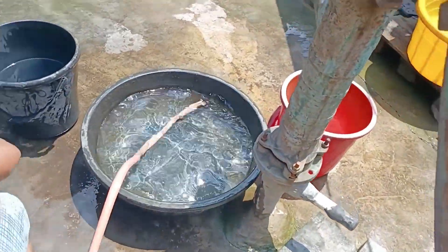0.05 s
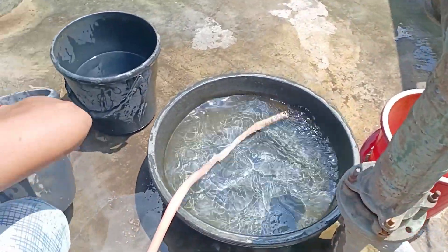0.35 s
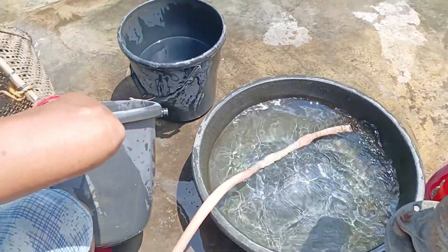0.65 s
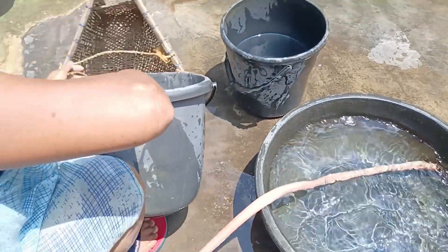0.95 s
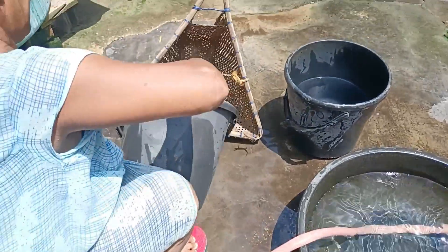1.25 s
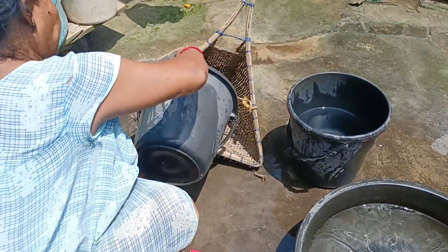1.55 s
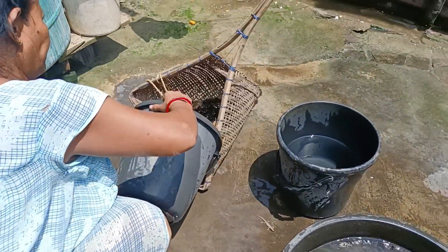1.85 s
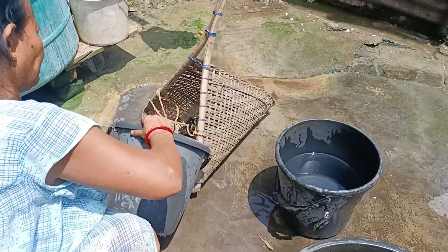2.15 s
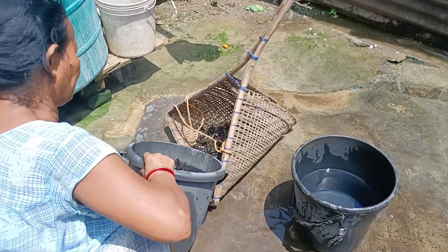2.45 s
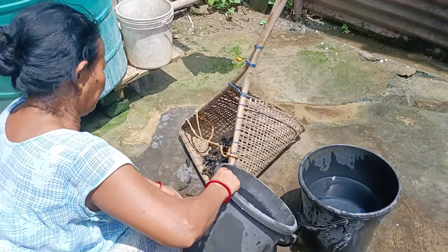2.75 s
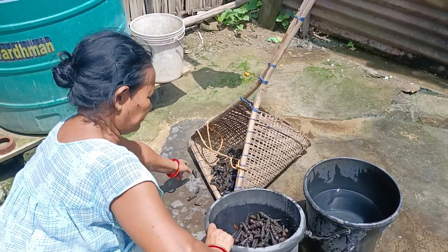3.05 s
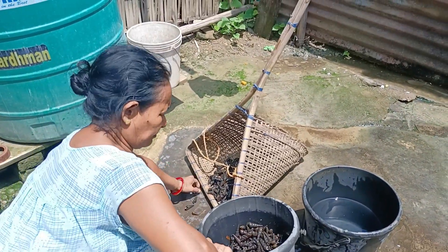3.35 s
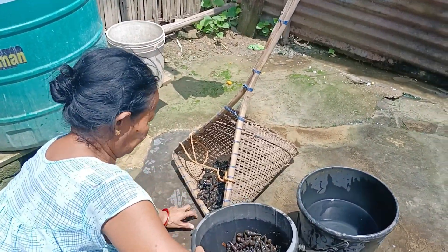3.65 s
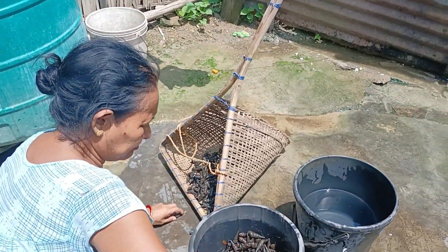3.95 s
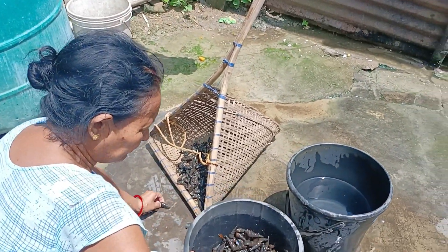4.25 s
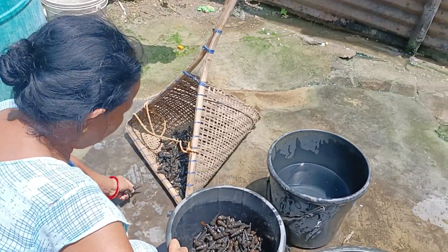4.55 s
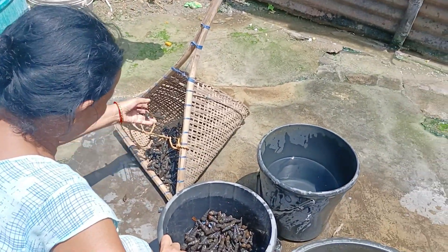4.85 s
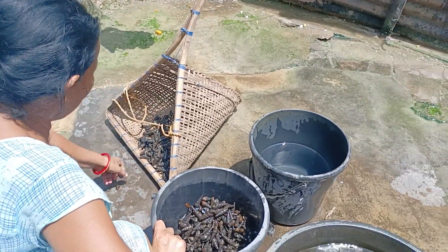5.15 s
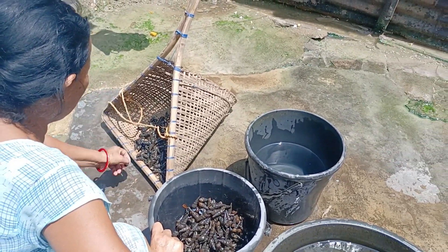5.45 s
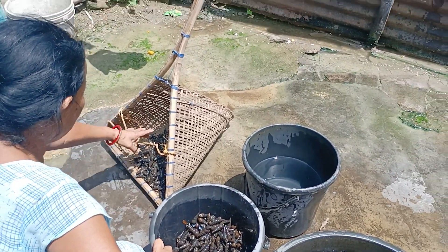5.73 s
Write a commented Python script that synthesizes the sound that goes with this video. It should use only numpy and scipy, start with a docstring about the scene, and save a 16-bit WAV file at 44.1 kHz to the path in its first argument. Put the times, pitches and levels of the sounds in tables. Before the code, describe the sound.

In an open yard, a plastic bucket bumps and small snail shells shift inside it. They slide out into a bamboo basket in a dense, bright rattle, pattering on the plastic, and the rest are shaken back with hollow knocks. Lighter stirring follows, something hard clatters on concrete, and single shells clink. The sounds are close, with a short echo over a faint low outdoor rumble.

```python
"""Small snail shells slide out of a tipped plastic bucket into a bamboo basket in an open yard.
Each collision is a tiny damped ring; thousands make the rattle and the patter on the bucket wall.
The bucket is righted, shaken and knocked: its wall rings and its hollow booms, lower while it leans.
Then something hard clatters on the concrete. Single shells clink here and there, weight lands in dull
thuds, and a short echo and a low outdoor rumble lie behind it all."""
import sys
import numpy as np
from scipy import signal
from scipy.io import wavfile

SR = 44100
rng = np.random.default_rng(int(sys.argv[2]) if len(sys.argv) > 2 else 0)


def to_wav(sig):
    """Store sig (one row per channel, or 1-D mono) as 16-bit WAV at the path in sys.argv[1].

    Samples outside -1..1 are clipped; the rate is SR.
    """
    pcm = np.clip(np.atleast_2d(sig), -1, 1) * 32767
    pcm = np.round(pcm).astype(np.int16)
    wavfile.write(sys.argv[1], SR, pcm.T)  # frames by channels


N = 264159

# freq_hz, gain_db
SHELL_EQ = [(900, -18), (2000, -6), (3500, -0.5), (5000, -1.5), (6200, 1.5), (7700, -5.5), (9000, -2),
            (10500, 0.5), (12500, 1), (15500, -3.5)]
PATTER_EQ = [(150, -39.5), (330, -5), (420, -9.5), (520, -7), (700, -1), (1150, 0), (1600, 1), (2300, 1),
             (3200, -2.5), (4500, -15.5), (8000, -43)]
BUCKET_EQ = [(70, -20), (110, -15.5), (150, 4.5), (200, -1), (15000, -2)]  # little radiation below the hollow


def shell_rattle():
    """Shells tick on each other, sometimes ring, patter on the plastic and stir the bucket's air."""
    t = np.arange(N) / SR
    shell_db, tilt_db_oct, wall_db, hollow_db = follow(shell_motion(), t)
    ticks = collisions(shell_db, tilt_db_oct, low_hz=2138, high_hz=14980, decay_cycles=4, spread_db=1.5,
                       min_density=0.55, full_db=-19, lag_s=0.0003, count=48000, size=104)
    tinkle_db = shell_db + 1.2 * np.minimum(tilt_db_oct, 2)
    tinkle = collisions(tinkle_db, tilt_db_oct, low_hz=9170, high_hz=13970, decay_cycles=66, spread_db=3,
                        min_density=0.6, full_db=-19.5, lag_s=0.00033, count=900, size=768)
    patter = collisions(wall_db, np.zeros(N), low_hz=361, high_hz=3510, decay_cycles=6.1, spread_db=2,
                        min_density=0.6, full_db=-28, lag_s=0.00015, count=15000, size=384)
    hollow_hz = hollow_pitch(t)
    air = resonate(stereo_noise(N), hollow_hz, width_hz=75)
    air = resonate(air, hollow_hz, width_hz=85)
    shells = colour(amp(-0.92) * ticks + amp(-15) * tinkle, SHELL_EQ)
    bucket = amp(1.03) * colour(patter, PATTER_EQ) + amp(hollow_db + 0.15) * unit_rms(air)
    return shells + colour(bucket, BUCKET_EQ, size=4096)


def collisions(level_db, tilt_db_oct, low_hz, high_hz, decay_cycles, spread_db,
               min_density, full_db, lag_s, count, size):
    """Tiny rings of random pitch crowd as the load moves faster; rms follows level_db."""
    when, pitch, chance, phase = rng.random((count, 4)).T
    heft, delay, pan = rng.standard_normal((count, 3)).T
    at = (when * (N - 1)).astype(int)
    density = np.clip(amp((level_db[at] - full_db) / 2), min_density, 1)
    octaves = np.log2(high_hz / low_hz)
    slope_db = tilt_db_oct[at] * octaves
    mean_power = np.mean(amp(slope_db[:, None] * np.linspace(0, 1, 10)) ** 2, 1)
    gain = unit_rms(amp(spread_db * np.clip(heft, -2, 2))) * amp(slope_db * pitch + level_db[at])
    gain /= np.sqrt(mean_power * density * count / N)
    hit = chance < density
    at, pitch, phase, gain, delay, pan = (v[hit, None] for v in (at, pitch, phase, gain, delay, pan))
    hz, n = low_hz * 2 ** (octaves * pitch), np.arange(size)
    cycles = hz * n / SR
    envelope = np.exp(-cycles / decay_cycles) * (1 - np.exp(-2 * cycles)) * (1 - n / size)
    envelope *= gain / np.sqrt((envelope ** 2).sum(1, keepdims=True) / 2)
    out = []
    for side in (-0.5, 0.5):
        tones = np.sin(2 * np.pi * (cycles + phase + side * lag_s * hz * delay))
        grains = envelope * np.sqrt(1 + side * np.tanh(pan)) * tones
        out.append(np.bincount((at + n).ravel(), grains.ravel(), N)[:N])
    return np.array(out)


# per pour: time_s, shell_db, tilt_db_oct, wall_db, hollow_db
POURS = [
    [(1.51, -38, -6.5, -37, -50), (1.53, -30.5, 1, -31, -43), (1.61, -23.5, -5, -19.5, -37),
     (1.64, -19, 1, -12, -24), (1.72, -15, -4, -12.5, -34), (1.835, -16, -3.5, -12.5, -32.5),
     (1.865, -6.5, 2, -18.5, -32), (2.125, -18, -1.5, -24.5, -40.5), (2.155, -16.5, -1.5, -22, -22.5),
     (2.275, -25.5, -2.5, -23.5, -27.5), (2.32, -30, -2, -29.5, -50), (2.45, -38, -3, -58, -53.5)],
    [(2.468, -37, -2, -36, -59), (2.478, -20.5, -12, -25.5, -49), (2.51, -23.5, -9.5, -22.5, -40.5),
     (2.535, -16.5, -6.5, -14, -25.5), (2.67, -18, -5.5, -19, -25), (2.74, -32.5, -2, -26.5, -31.5),
     (2.79, -26, -7, -24.5, -30), (2.865, -49.5, -4, -44, -50)],
]  # out into the basket, then the rest shaken back
# start_s, rise_s, hold_s, shell_db, tilt_db_oct, wall_db
STIRS = [(0.0, 0.0017, 0.042, -47.5, -4.5, -58), (0.078, .02, .07, -58, -5, -58.5),
         (0.155, 0.015, 0.008, -35, -13.5, -42.5), (0.229, 0.028, 0.096, -37, -8.5, -46.5),
         (0.382, .017, 0.087, -44, 1, -53), (0.467, 0.032, 0.066, -39, -2, -43.5),
         (0.633, 0.01, 0.039, -46.5, -1.5, -48), (0.688, 0.021, 0.046, -44.5, -3, -38),
         (0.75, 0.017, 0.012, -30.5, -5.5, -60), (0.854, 0.014, 0.039, -34, -3, -41.5),
         (0.977, .012, 0.12, -33.5, -3.5, -48), (1.23, 0.0074, 0.023, -30, -9.5, -28),
         (1.305, .03, 0.19, -38, -11.5, -39), (2.893, 0.0031, 0.021, -26.5, -13, -25),
         (2.955, 0.017, .025, -36.5, -10, -37.5), (3.036, 0.014, 0.068, -28, -8, -30),
         (3.089, 0.13, 0.12, -29.5, -4.5, -31), (3.336, 0.058, 0.15, -33, -3.5, -31.5),
         (3.57, 0.082, 0.066, -39, -4, -37), (3.734, 0.0033, 0.028, -45, 4, -30.5),
         (3.808, 0.027, 0.064, -54, -1, -43.5), (3.874, 0.0033, 0.036, -36.5, -4, -32),
         (3.95, .004, 0.017, -29.5, -27, -48), (4.124, 0.021, 0.074, -62.5, -1, -66),
         (4.242, 0.064, .02, -41.5, -3, -44), (4.37, 0.017, 0.077, -45.5, -3, -50.5),
         (4.536, 0.028, 0.095, -29.5, -19, -33), (4.662, 0.039, 0.11, -62, -7, -47),
         (5.159, 0.006, 0.013, -30.5, -3, -45), (5.184, .004, 0.038, -27, 0.5, -59),
         (5.307, .012, .015, -46.5, -3, -57), (5.417, 0.018, .025, -44, -3.5, -51),
         (5.8, 0.062, 0.12, -53.5, -4.5, -73.5), (5.88, 0.0066, 0.024, -42, -2, -55)]
REST_DB, SAG_DB_PER_S, SETTLE_DB_PER_S = -79, 8.5, 300.5
HOLLOW_HELD_DB, HOLLOW_STANDING_DB, SET_DOWN_S = -8, -19, 3.94  # levels relative to wall_db


def shell_motion():
    """Stirs and pours add in power, the loudest dominating the tilt; columns as in POURS."""
    t = np.arange(0, N, 32) / SR
    rest = np.outer([REST_DB, 0, REST_DB, REST_DB], np.ones_like(t))
    moves = [rest] + [stir(t, *row) for row in STIRS] + [pour(t, curve) for curve in POURS]
    shell_db, tilt_db_oct, wall_db, hollow_db = np.swapaxes(moves, 0, 1)
    tilt_db_oct = np.average(tilt_db_oct, axis=0, weights=amp(shell_db) ** 2)
    shell_db, wall_db, hollow_db = 10 * np.log10((amp([shell_db, wall_db, hollow_db]) ** 2).sum(1))
    return np.transpose([t, shell_db, tilt_db_oct, wall_db, hollow_db])


def pour(t, curve):
    """The sliding load follows its curve and dies away on either side."""
    shell_db, tilt_db_oct, wall_db, hollow_db = follow(curve, t)
    fade_db = -SETTLE_DB_PER_S * abs(t - np.clip(t, curve[0][0], curve[-1][0]))
    return shell_db + fade_db, tilt_db_oct, wall_db + fade_db, hollow_db + fade_db


def stir(t, start_s, rise_s, hold_s, shell_db, tilt_db_oct, wall_db):
    """Nudged shells speed up, slowly lose force, then settle."""
    held_s = t - start_s - rise_s
    shape_db = 20 * np.log10(np.clip((t - start_s) / rise_s, 1e-6, 1))
    shape_db -= SAG_DB_PER_S * np.clip(held_s, 0, hold_s)
    shape_db -= SETTLE_DB_PER_S * np.maximum(held_s - hold_s, 0)
    hollow_db = wall_db + (HOLLOW_HELD_DB if start_s < SET_DOWN_S else HOLLOW_STANDING_DB)
    return shell_db + shape_db, np.full_like(t, tilt_db_oct), wall_db + shape_db, hollow_db + shape_db


# start_s, wall_db, hollow_db, crack_db, spot_hz
KNOCKS = [(0.172, -39.5, -42, -40, 2300), (0.504, -27.5, -37.5, -37, 950), (0.705, -35.5, -37.5, -37, 1150),
          (0.879, -30.5, -37, -30.5, 2000), (0.9698, -18, -29.5, -20, 2100),
          (0.9725, -11, -27.5, -17.5, 1420), (1.128, -23.5, -34.5, -29.5, 1210),
          (1.237, -25.5, -33, -33, 2000), (1.337, -30, -50, -55, 1390), (1.523, -26, -38, -25.5, 2610),
          (1.622, -10, -20, -24, 1070), (1.645, -11, -25, -13, 1133), (1.699, -11.5, -36, -25.5, 1330),
          (1.729, -11.5, -33, -9.5, 1527), (1.802, -19, -22, -27, 2537), (1.975, -26, -24.5, -25.5, 2600),
          (2.098, -20.5, -46, -22, 1200), (2.138, -15, -25, -22.5, 1450), (2.36, -26.5, -64, -24.5, 1199),
          (2.476, -22, -46, -22.5, 2450), (2.506, -16, -47, -19, 1190), (2.64, -12, -32, -30, 730),
          (2.68, -17, -23, -20, 1148), (2.748, -21.5, -46, -43.5, 830), (2.916, -15.5, -20.5, -23, 800),
          (3.115, -20, -32, -40, 850), (3.351, -24, -36, -44, 880), (3.368, -17, -18.5, -46, 880),
          (3.476, -17.5, -36, -26.5, 950), (3.485, -20.5, -21, -24, 1000), (3.529, -21.5, -32, -51, 760),
          (3.69, -29.5, -41, -50, 830), (3.745, -14, -30, -23.5, 1010), (3.75, -23.5, -16.5, -38, 535),
          (3.958, -25.5, -56.5, -28.5, 1020)]
# freq_hz, gain_db, t60_s
WALL_MODES = [(400, -7.5, 0.044), (525, -3, 0.16), (616, -5, 0.11), (756, -4, 0.11), (850, 2, 0.07),
              (991, -1.5, 0.038), (1090, -1.5, 0.13), (1160, -4.5, 0.048), (1442, -5.5, 0.091),
              (1625, -0.5, 0.059), (1903, -13, 0.021), (1920, -3.5, 0.1), (2210, -6, .05), (2510, -20, .05),
              (2890, -13.5, 0.2)]
# freq_hz, gain_db
SLAP_EQ = [(120, -25.5), (300, 5), (800, 0), (1600, 0.5), (2400, -8.5), (4000, -23.5), (9000, -49.5)]
CRACK_EQ = [(500, -27), (1500, 1.5), (2400, 4.5), (4000, -3), (6200, -8.5), (7700, -21), (11000, -16),
            (15000, -26)]


def bucket_knocks():
    """Each blow rings the wall and the hollow, with a slap and a crack at the contact."""
    out, t = np.zeros((2, N)), np.arange(SR // 5) / SR
    for start_s, wall_db, hollow_db, crack_db, spot_hz in KNOCKS:
        modes = ring(t, WALL_MODES, spot_hz, focus_db=11, scatter_db=2, detune=0.03, lag_s=0.0002)
        modes *= 1 - np.exp(-t / 0.0011)
        wall = amp(-0.5) * modes + amp(-4.5) * burst(t, SLAP_EQ, t60_s=0.046)
        boom = amp(hollow_db + 0.06) * hollow(t, start_s, t60_s=0.1)
        crack = amp(crack_db) * burst(t, CRACK_EQ, t60_s=0.13)
        add(out, start_s, amp(wall_db) * wall + boom + crack)
    return colour(out, BUCKET_EQ, size=4096)


def hollow(t, start_s, t60_s):
    """The air in the bucket booms after a blow, and the bucket's base with it."""
    hz, sides = hollow_pitch(start_s), np.array([[1], [-1]])
    air = np.sin(2 * np.pi * hz * t + sides * hz / 850) * amp(-60 * t / t60_s)
    base = np.sin(2 * np.pi * 385 * t - sides * 0.45) * amp(1 - 60 * t / 0.061)
    return unit_attack((air + base) * (1 - np.exp(-t / 0.004)))


# tipped_s, until_s, righting_s
TIPS = [(.15, .22, 0.16), (0.873, 1.026, 0.12), (1.635, 2.032, 0.79)]
UPRIGHT_HZ, TIPPED_HZ, TIPPING_S = 305.2, 180, 0.23


def hollow_pitch(time_s):
    """The hollow falls in pitch as the bucket tips and returns as it is righted."""
    lean = sum(np.interp(time_s, [tipped - TIPPING_S, tipped, until, until + righting], [0, 1, 1, 0])
               for tipped, until, righting in TIPS)
    return UPRIGHT_HZ + (TIPPED_HZ - UPRIGHT_HZ) * lean


# start_s, body_db, hollow_db, crack_db, spot_hz
CLATTER = [(4.422, -30, -37.5, -50, 726), (4.506, -19.5, -28, -40, 586), (4.555, -19, -38, -34, 1710),
           (4.58, -13, -29.5, -28, 760), (4.594, -14.5, -37, -23, 770), (4.611, -27, -34, -43, 780),
           (4.619, -20, -45, -45, 800), (4.633, -27, -34.5, -36, 715), (4.648, -23.5, -43, -35, 575),
           (4.669, -24.5, -54, -46, 1730), (4.685, -26, -60, -56, 760), (4.739, -33, -51, -41, 750),
           (4.789, -35, -57, -76, 835), (4.816, -37.5, -61, -66, 555), (4.853, -53, -61, -60, 618),
           (5.164, -37, -70, -41, 780), (5.331, -48, -59, -60, 780), (5.445, -40, -46, -52, 1660),
           (5.454, -38, -54, -47, 1680), (5.644, -44, -62, -58, 1137), (5.892, -49.5, -66, -46, 605),
           (5.975, -49, -79, -49, 1430)]
# freq_hz, gain_db, t60_s
CLATTER_MODES = [(490, -7, 0.16), (559.5, -3, 0.16), (619, -2, 0.088), (767, 2.5, 0.099), (861, -1, 0.028),
                 (1170, -3.5, .025), (1620, 3.5, 0.055), (1775, 3, 0.025), (2300, -6, 0.03)]


def clatter():
    """Something hard rocks to rest on the concrete in dry, partly choked clacks."""
    out, t = np.zeros((2, N)), np.arange(SR // 5) / SR
    choke = 0.46 + np.exp(-t / 0.0064)
    for start_s, body_db, hollow_db, crack_db, spot_hz in CLATTER:
        modes = ring(t, CLATTER_MODES, spot_hz, focus_db=5, scatter_db=2, detune=0.05, lag_s=0.0001)
        body = amp(0.14) * unit_attack(modes * choke) + amp(-20) * burst(t, SLAP_EQ, t60_s=0.089)
        boom = amp(hollow_db) * hollow(t, start_s, t60_s=0.16)
        crack = amp(crack_db) * burst(t, CRACK_EQ, t60_s=0.059)
        add(out, start_s, amp(body_db) * body + boom + crack)
    return colour(out, [(90, -11), (180, -15.5), (280, -2), (15000, 0.5)])


# start_s, tick_db, ring_db, pitch_hz
CLINKS = [(0.039, -62, -50, 2740), (.318, -51, -40, 2180), (.383, -46.5, -46, 10700),
          (.395, -56, -38, 12160), (.915, -49, -36, 12300), (1.056, -44, -37.5, 9720),
          (2.8953, -30, -32, 2280), (3.037, -39.5, -47, 2570), (3.228, -40, -42, 6100),
          (3.355, -41, -35.5, 11320), (3.436, -39.5, -40.5, 13900), (3.486, -40, -31.5, 11800),
          (3.756, -33.5, -38, 12400), (3.825, -50, -40.5, 10320), (3.879, -37.5, -33, 13400),
          (3.92, -37, -33, 2930), (4.4, -35, -47, 10580), (5.167, -37, -26.5, 9450),
          (5.193, -17.5, -17, 4940), (5.2235, -31, -22, 11460), (5.233, -44, -30.5, 11500),
          (5.32, -37, -40, 6620), (5.421, -43.5, -51, 14130), (5.89, -40, -46.5, 6280)]


def shell_clinks():
    """A single shell rings with a cluster of close modes over a sharp tick."""
    out, t = np.zeros((2, N)), np.arange(SR // 8) / SR
    cluster = [(0.94, -3.5, 0.018), (0.975, 4.5, 0.026), (1.01, -8.5, 0.029), (1.05, -3.5, 0.028)]
    tick_eq = [(600, -47), (2000, -16), (4500, 8), (6500, 9.5), (8000, 1.5), (11500, 0), (15000, -5)]
    for start_s, tick_db, ring_db, pitch_hz in CLINKS:
        modes = [(pitch_hz * ratio, gain_db, t60_s) for ratio, gain_db, t60_s in cluster]
        tick = burst(t, tick_eq, t60_s=0.033)
        ping = ring(t, modes, pitch_hz, focus_db=1.5, scatter_db=5, detune=0.005, lag_s=0.00035)
        add(out, start_s, amp(ring_db) * ping + amp(tick_db) * tick)
    return out


# start_s, level_db, pitch_hz, t60_s
THUDS = [(0.88, -22.5, 171, 0.06), (0.9714, -10, 372, 0.058), (0.9729, -14, 611, 0.086),
         (0.975, -28, 165, 0.14), (1.128, -13.5, 427, 0.021), (1.622, -19, 59.4, 0.11),
         (3.114, -17.5, 806, 0.054), (4.457, -26, 78.5, 0.23), (4.504, -16, 500, 0.057),
         (4.58, -33, 41.6, 0.37)]


def thuds():
    """Bumps of the loaded bucket and of weight on the ground: one damped mode each."""
    out, t = np.zeros((2, N)), np.arange(SR // 4) / SR
    for start_s, level_db, pitch_hz, t60_s in THUDS:
        envelope = amp(level_db - 60 * t / t60_s) * (1 - np.exp(-2 * pitch_hz * t))
        add(out, start_s, envelope * np.sin(2 * np.pi * pitch_hz * t)[None])
    return out


# freq_hz, gain_db
ECHO_EQ = [(100, -19.5), (200, -6.5), (300, 1.5), (500, -2.5), (1500, -3.5), (5000, -0.5), (15000, 0)]
# freq_hz, t60_s
ECHO_T60 = [(150, 0.72), (400, 0.24), (1000, 0.3033), (3000, 0.0555), (7000, 0.2447), (15000, 0.16)]


def yard_echo(x):
    """Ground and fences scatter a short tail."""
    hz, t, spectrum = signal.stft(stereo_noise(SR // 2), SR, nperseg=256)
    decay_db = at_hz(ECHO_EQ, hz)[:, None] - 60 * t / at_hz(ECHO_T60, hz)[:, None]
    tail = signal.istft(spectrum * amp(decay_db), SR, nperseg=256)[1]
    tail *= 1 - np.exp(-(np.arange(tail.shape[1]) / SR / 0.00081) ** 2)
    return signal.fftconvolve(x, tail / np.linalg.norm(tail[0]), axes=1)[:, :N]


# freq_hz, gain_db
YARD_EQ = [(20, -6), (45, 2.5), (80, -1), (130, -5), (200, -16), (400, -25), (800, -28), (1500, -30.5),
           (3000, -29), (6000, -36), (7700, -43.5), (10000, -35.5), (15000, -44.5)]


def yard_air(level_db=-52):
    """Steady low rumble of the open air."""
    return amp(level_db) * unit_rms(colour(stereo_noise(N), YARD_EQ, size=8192))


# freq_hz, side_minus_mid_db
STEREO_WIDTH = [(30, -9.5), (170, -20), (280, -10), (600, -3.5), (1200, 0.5), (2200, 1.5), (16000, -1.5)]


def stereo_noise(size):
    """Diffuse noise: left and right alike in the bass, apart in the treble."""
    mid, side = rng.standard_normal((2, 1, size))
    side = colour(side, STEREO_WIDTH)
    return np.vstack([mid + side, mid - side])


def burst(t, eq, t60_s):
    """A short splash of contact noise."""
    return unit_attack(colour(stereo_noise(len(t)) * amp(-60 * t / t60_s), eq))


def ring(t, modes, spot_hz, focus_db, scatter_db, detune, lag_s):
    """Damped modes, varied per blow; the struck spot favours those near spot_hz."""
    hz, gain_db, t60_s = np.transpose(modes)[:, :, None]
    weight, delay, shift = rng.standard_normal((3, len(hz), 1))
    gain_db = gain_db + focus_db * np.exp(-(2 * np.log2(hz / spot_hz)) ** 2) + scatter_db * weight
    envelopes = rng.choice([-1, 1], hz.shape) * amp(gain_db - 60 * t / t60_s)
    hz = hz * (1 + detune * shift)
    tones = np.array([np.sin(2 * np.pi * hz * (t + side * lag_s * delay)) for side in (-0.5, 0.5)])
    return unit_attack((envelopes * tones).sum(1))


def resonate(x, hz, width_hz):
    """Unity-gain resonance that follows the curve hz."""
    carrier = np.exp(2j * np.pi * np.cumsum(hz) / SR)
    pole = np.exp(-np.pi * width_hz / SR)
    return 2 * (carrier * signal.lfilter([1 - pole], [1, -pole], x / carrier + 1e-18)).real


def colour(x, eq, size=2048):
    """Minimum-phase filter; eq rows are freq_hz, gain_db."""
    log_gain = np.log(amp(at_hz(eq, abs(np.fft.fftfreq(size, 1 / SR)))))
    taps = np.fft.ifft(np.exp(np.conj(signal.hilbert(log_gain)))).real
    return signal.oaconvolve(x, taps[None], axes=1)[:, :x.shape[1]]


def amp(db):
    return 10 ** (np.asarray(db) / 20)


def unit_rms(x):
    return x / np.sqrt(np.mean(x ** 2) + 1e-20)


def unit_attack(x):
    """Rms 1 over the first 12 ms."""
    return x / np.sqrt(np.mean(x[:, :530] ** 2) + 1e-20)


def at_hz(table, hz):
    freq_hz, values = np.transpose(table)
    return np.interp(np.log(hz + 1), np.log(freq_hz), values)


def follow(table, t):
    time_s, *columns = np.transpose(table)
    return [np.interp(t, time_s, column) for column in columns]


def add(mix, start_s, sound):
    part = mix[:, round(start_s * SR):][:, :sound.shape[1]]
    part += sound[:, :part.shape[1]]


def scene():
    """Shells, blows and their echo over the open air, a touch louder on the right."""
    shells, knocks, clacks, clinks = shell_rattle(), bucket_knocks(), clatter(), shell_clinks()
    air = yard_air()
    echo = yard_echo(amp(-4) * shells + amp(-8) * knocks + amp(-2.5) * (clacks + clinks))
    return (shells + knocks + clacks + clinks + thuds() + echo + air) * amp([[-0.4], [0.4]])


def record(dry):
    """Clip at full scale, then low-pass."""
    lowpass = signal.firwin(511, cutoff=15500, window=("kaiser", 8), fs=SR)
    return signal.oaconvolve(np.clip(dry, -1, 1), lowpass[None], "same", axes=1)


dry = scene()
out = record(dry)
to_wav(out)
```